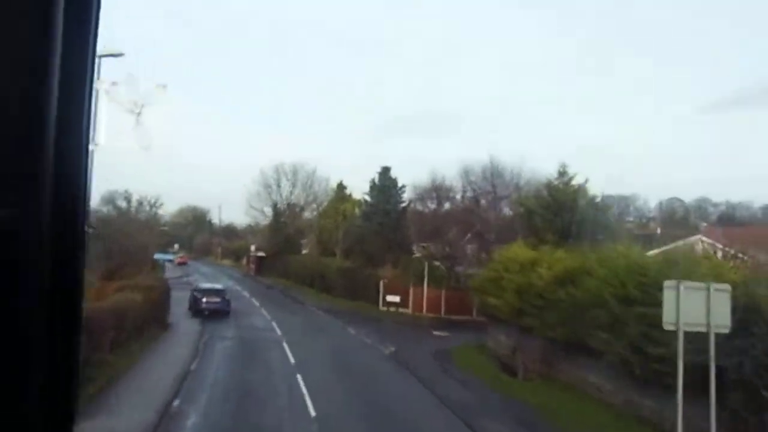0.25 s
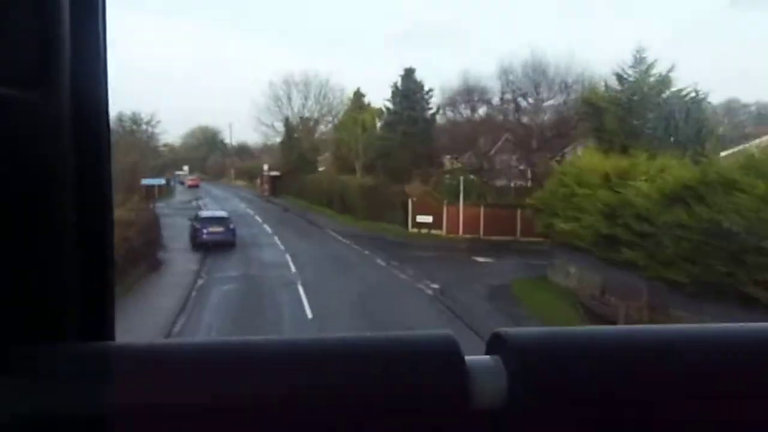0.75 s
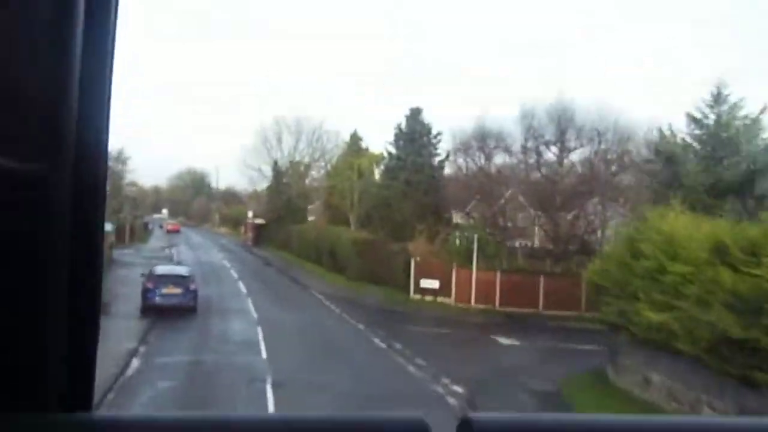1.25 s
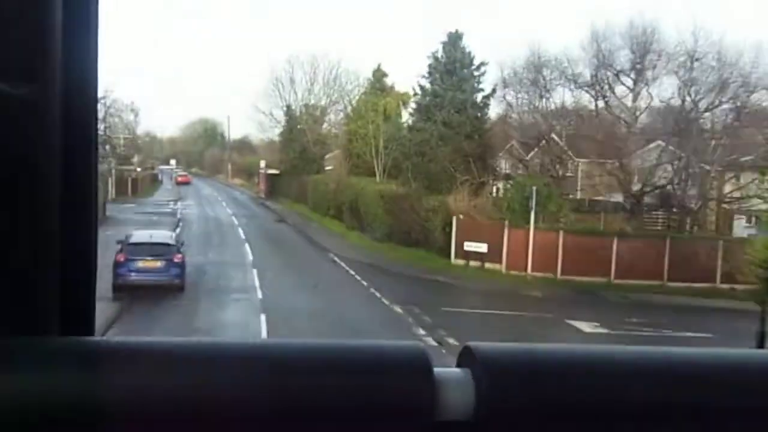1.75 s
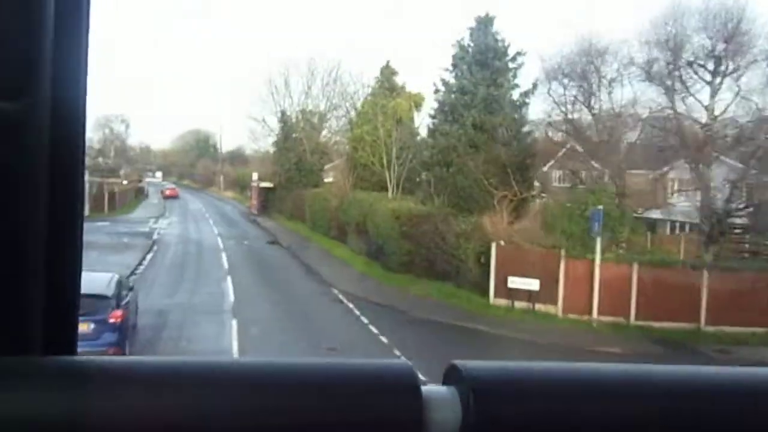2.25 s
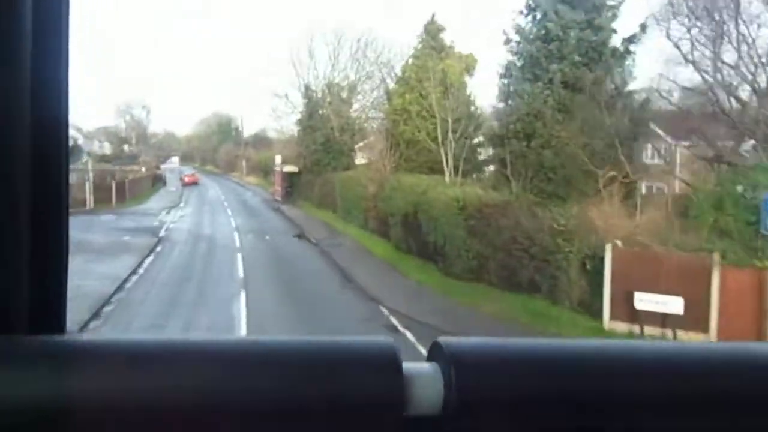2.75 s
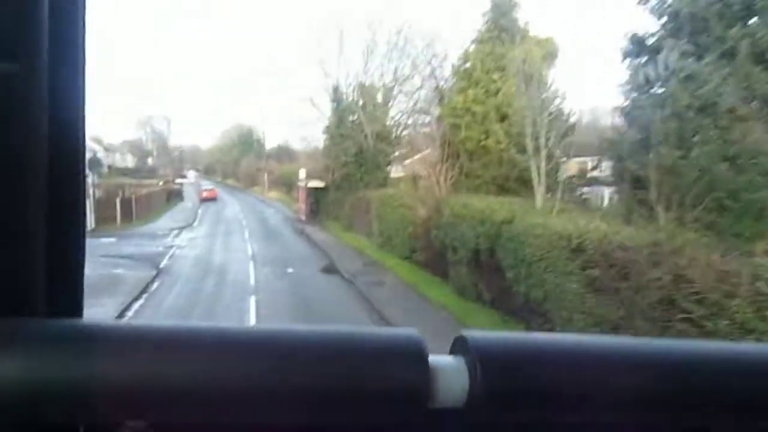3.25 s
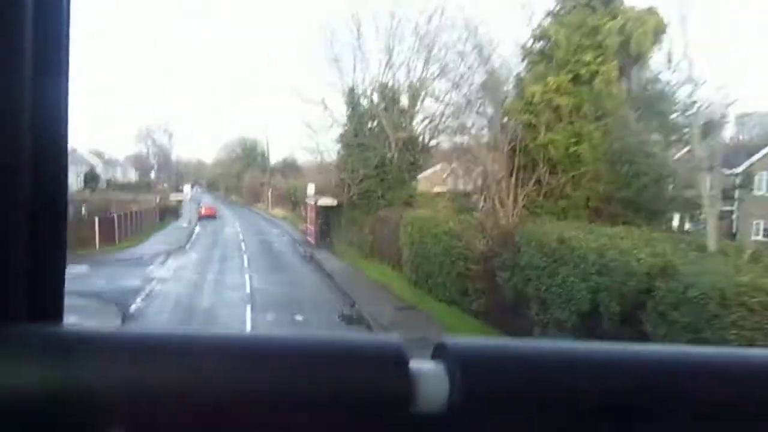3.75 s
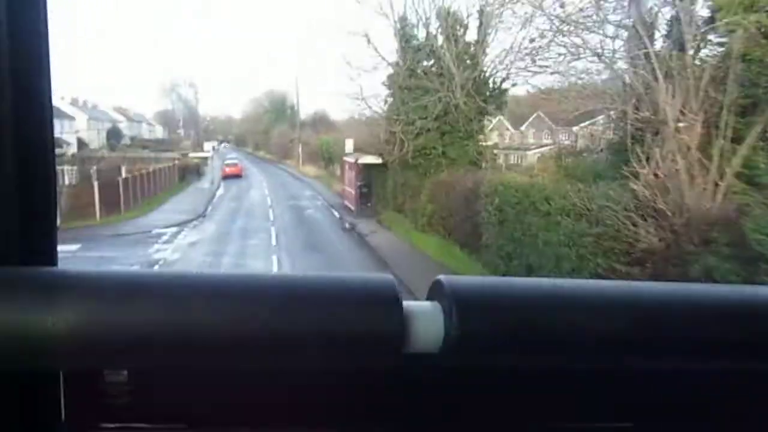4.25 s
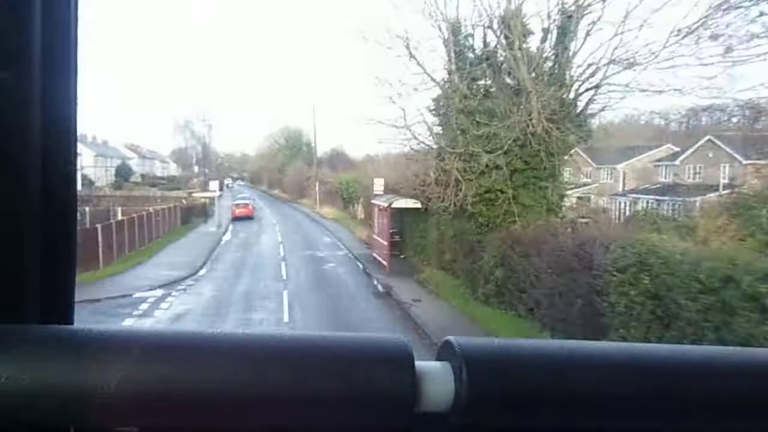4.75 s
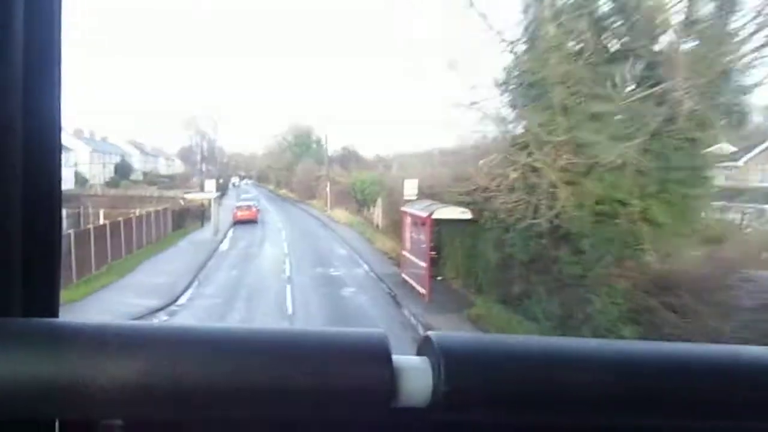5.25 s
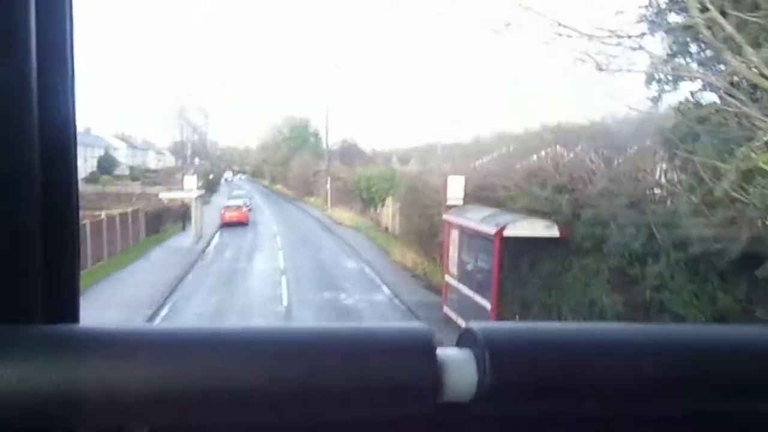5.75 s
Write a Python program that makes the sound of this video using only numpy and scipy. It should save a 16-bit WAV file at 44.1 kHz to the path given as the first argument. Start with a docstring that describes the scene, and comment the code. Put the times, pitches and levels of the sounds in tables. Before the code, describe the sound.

Inside the upper deck of a moving bus, deep booming air and lumpy rumble dominate, with quieter tyre roar and wet hiss behind. Trim ticks and rattles, and thin squeaks chirp early. A faint steady gear whine fades after three seconds. Two clusters of heavy bumps around 3.7 and 4.2-4.7 seconds overload the close, mono microphone, chopping the hiss, before calmer rumble returns.

```python
"""The cabin of a bus booms and rumbles around a listener at the front window of the upper deck.
Bumps swell resonant noise; short low tone bursts make the rumble lumpy. Shaped noise is road roar, hiss and spray.
Trim rattles as ringing noise bursts, panels knock, squeaks glide and the gears whine as tone pairs.
The biggest pressure swings overload the microphone input, which goes flat and blanks the hiss for milliseconds."""
import sys
import numpy as np
from scipy import signal
from scipy.fft import rfft, irfft, next_fast_len
from scipy.io import wavfile
from scipy.ndimage import uniform_filter1d, minimum_filter1d

SR = 44100
rng = np.random.default_rng(int(sys.argv[2]) if len(sys.argv) > 2 else 0)


def master(y):
    """Save y as 16-bit WAV."""
    cut = np.clip(np.atleast_2d(y).T, -1, 1)
    pcm = np.round(cut * 32767)  # scale
    wavfile.write(sys.argv[1], SR, pcm.astype(np.int16))


N = 264159
T = np.arange(N) / SR

# Reference level for the cabin's low sound: (time [s], level [dB])
BODY_LEVEL = [(0.04, -28), (0.37, -31.5), (0.6, -28.5), (0.75, -31.5), (0.95, -34), (1.15, -34.5),
              (1.23, -34.5), (1.34, -30), (1.73, -33.5), (1.85, -29.5), (2.05, -34), (2.5, -32),
              (2.79, -32), (2.97, -27.5), (3.22, -23), (3.5, -33.5), (3.7, -17.5), (4.1, -31), (4.22, -11),
              (4.45, -29), (4.7, -35), (4.83, -38), (5.05, -35), (5.17, -39), (5.32, -32), (5.52, -29),
              (5.95, -31)]
# Bumps in the road: (time [s], boom added [dB], throb added [dB])
BUMPS = [(0.038, -9, -44), (0.12, -35, -28), (0.26, -26, -22.5), (0.45, -28, -28), (0.631, -13.5, -22),
         (0.76, -21, -19), (1.1, -21.5, -21.5), (0.921, -32.5, -32), (1.342, -16.5, -34), (1.58, -22, -34),
         (1.831, -20.5, -19.5), (1.949, -10, -30), (2.1, -17.5, -46), (2.33, -23.5, -29.5), (2.7, -36, -17),
         (2.79, -14, -26), (2.951, -21, -31.5), (3.07, -29, -15.5), (3.261, -8, -22), (3.581, -13.5, -17.5),
         (3.77, -28.5, -20.5), (4.05, -17, -35), (4.22, -14, -29), (4.33, -15, -25), (4.46, -15, -14),
         (4.58, -26, -32), (4.71, -19, -34), (5.03, -32, -36), (5.293, -24.5, -29), (5.498, -18.5, -42),
         (5.65, -33, -35), (5.901, -20, -31)]
# Cabin air on the springs: (frequency [Hz], relative level [dB])
BOOM_SPECTRUM = [(3, -60), (10, -7), (16, 0.5), (22, -7.5), (28, -7.5), (40, -28), (100, -130)]
# Floor resonance: (frequency [Hz], relative level [dB])
THROB_SPECTRUM = [(15, -67.5), (29, -25), (36, -4.5), (42, -6.5), (50, -24.5), (70, -52), (150, -130)]
# Takes the overtones off boom and throb: (frequency [Hz], relative level [dB])
OVERTONE_CUT = [(3, 0), (55, 0), (90, -30), (200, -90)]
# Engine and axle rumble: (frequency [Hz], relative level [dB])
RUMBLE_SPECTRUM = [(26, -26.5), (45, -8.5), (59, -9), (98, -5), (140, -19), (172, -16.5), (200, -36),
                   (260, -45), (440, -120)]
# Lumps in the rumble: short low tone bursts that swell and fade, some deeper, some higher:
# (centre time [s], width at half height [s], pitch [Hz], peak level [dB])
RUMBLE_LUMPS = [(0.128, 0.023, 83, -12.5), (0.151, 0.02, 159, -40), (0.174, 0.016, 89.0, -21.1),
                (0.22, 0.015, 88.0, -24.5), (0.254, 0.011, 163.0, -32), (0.332, 0.021, 81, -18.5),
                (0.333, 0.024, 170, -31), (0.375, 0.02, 165, -31), (0.62, 0.013, 83.6, -26),
                (0.721, 0.03, 170, -31), (0.726, 0.049, 81.0, -27), (0.779, 0.017, 77.0, -21),
                (0.84, 0.021, 94.5, -22), (1.096, 0.012, 80, -18), (1.155, 0.016, 71.0, -19),
                (1.153, 0.028, 173, -34.5), (1.228, 0.032, 170.0, -33), (1.343, 0.032, 63, -20),
                (1.417, 0.038, 76, -27), (1.63, 0.031, 75.0, -24.5), (1.701, 0.023, 87.0, -25),
                (1.82, 0.018, 67.4, -20.2), (1.883, 0.011, 67.0, -21), (1.949, 0.016, 172, -29),
                (1.97, 0.024, 70.6, -27), (2.32, 0.011, 70.0, -23.5), (2.598, 0.018, 75, -22),
                (2.635, 0.021, 165.0, -32), (2.672, 0.011, 75.5, -15), (2.706, 0.013, 171, -25.5),
                (2.735, 0.013, 67.0, -18), (2.804, 0.016, 161, -25.5), (2.834, 0.028, 71, -20),
                (2.867, 0.027, 160, -27), (2.893, 0.01, 82.5, -15), (2.912, 0.045, 164, -33.9),
                (2.972, 0.022, 88.5, -22), (3.007, 0.012, 76.0, -20.4), (3.084, 0.017, 80.0, -16),
                (3.109, 0.018, 162, -33.5), (3.164, 0.018, 82.4, -19), (3.202, 0.02, 85, -17),
                (3.288, 0.016, 81.0, -30), (3.366, 0.017, 75.4, -22.5), (3.382, 0.023, 169, -29),
                (3.568, 0.024, 68.5, -24), (3.615, 0.043, 93, -12), (3.66, 0.022, 159.0, -17.5),
                (3.937, 0.024, 80.4, -30), (3.948, 0.025, 158, -34), (3.982, 0.01, 93, -22),
                (4.004, 0.032, 169, -35.5), (4.065, 0.012, 77, -24), (4.134, 0.047, 161, -28.5),
                (4.165, 0.019, 69.0, -19.1), (4.415, 0.03, 157, -26.5), (4.423, 0.016, 73, -30),
                (4.718, 0.012, 92.0, -19.5), (5.468, 0.042, 158.0, -38), (5.516, 0.039, 88, -21.5),
                (5.587, 0.0083, 84.0, -18), (5.687, 0.024, 85, -21), (5.756, 0.017, 160.0, -35),
                (5.765, 0.024, 84.0, -22), (5.868, 0.023, 90, -33)]
# Pressure swings that overload the input: (centre time [s], time held flat [ms], direction [+1 or -1])
SWINGS = [(0.731, 1.3, -1), (2.780, 8, -1), (3.271, 3, 1), (3.317, 10, -1), (3.61, 4.0, 1),
          (3.6765, 18, -1), (3.699, 15.5, 1), (3.728, 11.5, -1), (3.746, 6.5, 1), (3.787, 5.5, -1),
          (3.842, 6.5, 1), (3.893, 4.5, -1), (3.919, 1.9, 1), (4.2135, 15.5, -1), (4.244, 21.7, 1),
          (4.272, 17.4, -1), (4.294, 7, 1), (4.3035, 6, 1), (4.32, 5, 1), (4.3555, 10.5, -1), (4.375, 7, 1),
          (4.456, 7, 1), (4.518, 12.5, -1), (4.547, 14.5, 1), (4.576, 12, -1), (4.623, 8, 1),
          (4.654, 13, -1), (4.683, 6, 1)]
# Road noise level as heard, with the recorder's gain steps:
# (time [s], overall level [dB], roar re overall [dB], spray re hiss [dB])
ROAD_LEVELS = [(0.04, -49.5, 4, -3), (0.15, -51.5, 8, -9), (0.2, -46, 6, -8), (0.34, -55, 10.5, -3),
               (0.4, -55, 10.5, -5.5), (0.55, -56, 6.5, -5.5), (0.62, -53, 9.5, -6.5),
               (1.0, -53, 5.5, -8.5), (1.42, -51, 9, -6.5), (1.55, -55.5, 9, -6), (1.78, -55, 7, -6.5),
               (1.96, -53.5, 7.5, -7), (2.34, -57, 6.5, -10), (2.58, -55, 10, -9.5), (2.61, -54, 7, -4.5),
               (2.76, -48, 7.5, -8), (2.86, -46.5, 6, -6), (2.93, -49, 7, -7.5), (3.07, -52, 9, -3.5),
               (3.26, -50.5, 9.5, -5), (3.45, -54.5, 9.5, -3.5), (3.51, -56.5, 2.5, -4.5),
               (3.53, -51.5, 7.5, -5.5), (3.8, -47.5, 9, -2), (4.06, -49.5, 6.5, -7), (4.2, -46.5, 7, -7.5),
               (4.33, -46, 8, -7.5), (4.43, -46.5, 8, -7.5), (4.52, -52.5, 7, -4.5), (4.676, -49, 1, -7),
               (4.682, -62, 3, -4), (4.701, -62, 3, -4), (4.706, -48.5, 7, -9), (4.765, -51, 3, -6.5),
               (4.785, -59, 8, -7.5), (4.85, -62, 8, -9.5), (5.29, -62.5, 7, -8.5), (5.3, -55, 7.5, -10),
               (5.6, -51.5, 9, -6), (5.82, -56, 7.5, -8.5), (5.95, -53.5, 8.5, -7)]
# Tyre roar through the panels: (frequency [Hz], relative level [dB])
ROAR_SPECTRUM = [(120, -7.5), (200, -0.5), (275, -4), (310, -5), (355, -8), (392, -9), (538, -12),
                 (681, -12), (1000, -17.5), (1300, -48), (2200, -120)]
# Tyre and wind hiss: (frequency [Hz], relative level [dB])
HISS_SPECTRUM = [(590, -13.5), (1000, -14), (1070, -4.5), (3000, -14), (3900, -21.5), (6600, -120)]
# Spray, the brightest road noise: (frequency [Hz], relative level [dB])
SPRAY_SPECTRUM = [(1760, -8), (3000, -8), (4420, -3), (6840, -8.5), (7480, -12), (8320, -23.5),
                  (10800, -38), (18300, -120)]
# Water thrown against the panels:
# (time [s], nominal length [s], nominal hiss rise [dB], nominal further spray rise [dB])
SPLASHES = [(0.078, 0.056, -2.5, 5.5), (0.27, 0.038, 2.5, 0), (0.32, 0.025, 2.5, 1.5),
            (0.57, 0.016, -3, 11), (0.806, 0.14, 2, 6.5), (1.445, 0.04, -1.5, 7), (1.596, 0.14, 2.5, 7),
            (2.011, .03, 3.5, 2.5), (2.601, 0.048, 4.5, 5), (2.736, 0.081, -2, 7.5), (3.279, 0.024, 7, 0.5),
            (3.362, 0.065, 8, -2), (3.551, .025, 1.5, -0.5), (3.666, 0.017, 2.5, 7), (3.717, 0.057, 2, -1),
            (4.279, 0.042, 4.5, 3), (4.337, 0.022, 7, 1.5), (4.356, 0.03, 0.5, 7),
            (4.531, 0.014, -4.5, 3.5), (4.576, 0.018, 1.5, 1), (4.655, 0.013, 5, -1)]
# Rattling trim: (time [s], nominal peak level [dB])
RATTLES = [(0.115, -38), (0.191, -40), (0.4245, -40), (0.503, -39.5), (0.5762, -40), (0.6216, -41.5),
           (0.653, -41.5), (0.734, -53), (0.771, -46), (0.914, -37.5), (1.097, -44), (1.1676, -45),
           (1.217, -53), (1.3329, -43), (1.3774, -40), (1.5994, -53), (2.583, -47), (2.608, -39),
           (2.831, -38), (2.9492, -36), (3.275, -41), (3.3682, -34), (3.525, -37.5), (3.686, -37),
           (3.938, -34.5), (3.987, -30), (4.706, -44), (4.9792, -49), (5.2967, -53), (5.332, -53),
           (5.3592, -46), (5.409, -43), (5.508, -32.5), (5.591, -36)]
# Modes of the rattling trim: (frequency [Hz], relative level [dB], time to fall 60 dB [s])
TRIM_MODES = [(3200, -2, .018), (3620, -2, .022), (4900, -7, .02), (5650, -7, .025)]
# Loose panel knocks: (time [s], pitch [Hz], level before rise and fade [dB])
KNOCKS = [(.213, 480, -41), (.64, 800, -45), (1.373, 760, -36), (1.817, 760, -40), (1.824, 790, -38),
          (2.697, 2480, -52), (2.829, 1600, -40), (2.83, 2500, -50), (2.752, 760, -42), (3.278, 1500, -38)]
# Squeaking trim: (time [s], length [s], start pitch [Hz], end pitch [Hz], nominal level [dB],
# second harmonic re first [dB])
SQUEAKS = [(.465, .014, 2500, 2600, -54, -10), (.482, .024, 2750, 2750, -56, -9),
           (.586, .028, 2740, 2750, -55, -10), (.808, .018, 2870, 2780, -51, -2.5),
           (.826, .05, 2820, 2790, -54, -8), (.886, .018, 2730, 2760, -51, -4),
           (.906, .022, 2740, 2810, -50.5, -11), (.928, .02, 2700, 2880, -56, -14),
           (2.691, .017, 1040, 1110, -43, -7), (2.707, .034, 1070, 1040, -47, -3)]
# Gear whine: (time [s], tooth mesh rate [Hz], level [dB])
GEAR_WHINE = [(0, 341, -57), (.12, 340, -58), (.17, 340, -52), (.4, 339, -52), (.72, 345, -51.5),
              (1.05, 342, -53), (1.15, 340, -59), (1.3, 339, -58), (1.38, 340, -51), (2.2, 340, -52),
              (2.52, 344, -53), (2.6, 341, -57), (2.68, 343, -52), (3.25, 348, -54.5), (3.5, 346, -74),
              (6, 346, -72)]

FLAT_TOP = 0.29  # input limit, amplitude
COUPLING_HZ, TOP_HZ = 8.5, 8300  # low and high cuts of the microphone chain
BOOM_FADE_S, THROB_FADE_S = 0.11, 0.073  # time for a bump's gain to fall to 1/e
BOOM_REST_DB, THROB_REST_DB = 1.5, -4  # between bumps, re body level
RUMBLE_REST_DB = -1  # between lumps, re body level
HISS_DB = -5.0  # re overall road level
SPLASH_RISE_S = 0.0017
ROAR_SHARE = 0.52  # part of a splash's rise in dB that the roar takes on
RATTLE_T60_S = 0.057
CREST_DB = 13  # allowance for how far a noise burst peaks over its rms
TRIM_DB = -26.5  # ringing modes re burst
KNOCK_RISE_S, KNOCK_FADE_S = .0008, .007  # exponential time constants
OCTAVE_DB = -9  # whine's second harmonic re first


def body():
    """Cabin air booms, the floor throbs, engine and axles rumble; swings ease off short of the input limit."""
    level_db, = read(BODY_LEVEL)
    boom_gain = bumps(level_db + BOOM_REST_DB, 1, BOOM_FADE_S)
    throb_gain = bumps(level_db + THROB_REST_DB, 2, THROB_FADE_S)
    low = boom_gain * resonance(BOOM_SPECTRUM)
    low += throb_gain * resonance(THROB_SPECTRUM)
    rumble_gain = undb(level_db + RUMBLE_REST_DB + 2.5 * walk(13))
    low += rumble_gain * colour(rng.standard_normal(N), RUMBLE_SPECTRUM)
    low += rumble_lumps()

    reach = .92 * FLAT_TOP
    window = int(.016 * SR)
    ease = minimum_filter1d(reach / np.maximum(np.abs(low), reach), 2 * window)
    return low * uniform_filter1d(uniform_filter1d(ease, window), window)


def bumps(rest_db, column, fade_s):
    """Bump energy swells and fades exponentially and adds to a resting level; returns gain."""
    power = undb(rest_db) ** 2
    for row in BUMPS:
        s = row[0]
        at = near(s - 6 * fade_s, s + 6 * fade_s)
        power[at] += undb(row[column]) ** 2 * np.exp(-2 * np.abs(T[at] - s) / fade_s)
    return np.sqrt(power)


def resonance(spectrum):
    """A driven resonance: narrow noise with evened level, stripped of overtones."""
    ringing = colour(rng.standard_normal(N), spectrum)
    return colour(evened(ringing, .6), OVERTONE_CUT)


def evened(x, share):
    """A well-driven resonance wanders more in pitch than level: reduce its level swings; rms 1."""
    envelope = np.abs(signal.hilbert(x, next_fast_len(N))[:N])
    y = x / (envelope + .2) ** share
    return y / np.std(y)


def rumble_lumps():
    """Lumps in the rumble: short low tone bursts that swell and fade, some deeper, some higher."""
    out = np.zeros(N)
    start_turns = rng.random(len(RUMBLE_LUMPS))
    for (s, width, hz, db), turn in zip(RUMBLE_LUMPS, start_turns):
        at = near(s - 2 * width, s + 2 * width)
        t = T[at] - s
        swell = 2. ** (-(2 * t / width) ** 2)
        out[at] += undb(db) * swell * np.sin(2 * np.pi * (hz * t + turn))
    return out


def swings(low):
    """Each big swing of cabin pressure takes over the low sound and arches past the input's limit."""
    out = low.copy()
    for s, held_ms, direction in SWINGS:
        held = held_ms / 1000
        span = held + 0.01987
        at = near(s - span / 2, s + span / 2)
        arch = np.cos(np.pi * np.clip((T[at] - s) / span, -.5, .5))
        # scaled to cross the limit at both ends of the held time
        peak = direction * FLAT_TOP / np.cos(np.pi * held / span / 2)
        swing = out[at] * (1 - np.clip(2.5 * arch, 0, 1)) + peak * arch
        # a crest already past the limit stays there
        out[at] = np.where(direction * out[at] > FLAT_TOP, out[at], swing)
    return out


def road():
    """Tyre roar, hiss and spray; shaking panels let them through unevenly, and loose bits tick sharply."""
    overall_db, roar_db, spray_db = read(ROAD_LEVELS)
    rise_db, more_db = splashes()
    shake = walk(60)
    # about 45 ticks a second, each fading over 3.7 ms
    ticks = (rng.random(N) < 45 / SR) * undb(1.2 * rng.exponential(size=N))
    chatter = signal.lfilter([1], [1, -np.exp(-1 / (0.0037 * SR))], ticks)

    roar_gain = undb(roar_db + ROAR_SHARE * rise_db + 1.8 * shake) * (1 + 0.06 * chatter)
    roar = roar_gain * colour(rng.standard_normal(N), ROAR_SPECTRUM)
    air = rng.standard_normal(N)  # hiss and spray share one noise
    hiss = (1 + 0.69 * chatter) * colour(air, HISS_SPECTRUM)
    spray = undb(spray_db + more_db) * (1 + 0.74 * chatter) * colour(air, SPRAY_SPECTRUM)
    bright_gain = undb(rise_db + 0.5 * shake + HISS_DB)
    return undb(overall_db) * (roar + bright_gain * (hiss + spray))


def splashes():
    """Thrown water changes hiss and spray quickly, holds for half its length, then lets go; in dB."""
    hiss_db, spray_db = np.zeros(N), np.zeros(N)
    for s, length, rise_db, more_db in SPLASHES:
        corners = [0, SPLASH_RISE_S, SPLASH_RISE_S + length / 2, SPLASH_RISE_S + 1.23 * length]
        # the small end values carry on before and after
        shape = np.interp(T - s, corners, [0.0058, 1.07, 1.04, 0.031])
        hiss_db += rise_db * shape
        spray_db += more_db * shape
    return hiss_db, spray_db


def rattles():
    """Trim knocks: a sharp burst of broad noise that dies fast and rings the trim's modes."""
    burst = np.zeros(N)
    for s, peak_db in RATTLES:
        at = near(s, s + RATTLE_T60_S)
        burst[at] += undb(peak_db - 60 * (T[at] - s) / RATTLE_T60_S)
    noise = rng.standard_normal(N)
    out = burst * (colour(noise, HISS_SPECTRUM) + 0.85 * colour(noise, SPRAY_SPECTRUM))
    for hz, db, t60 in TRIM_MODES:
        decay = np.exp(-np.log(1000) / (t60 * SR))  # per sample
        angle = 2 * np.pi * hz / SR
        poles = [1, -2 * decay * np.cos(angle), decay * decay]
        out += undb(db + TRIM_DB) * signal.lfilter([np.sin(angle)], poles, burst * noise)
    return undb(-CREST_DB) * out


def knocks():
    """A loose panel rings briefly: each knock is a tone that starts fast and fades."""
    out = np.zeros(N)
    for s, hz, db in KNOCKS:
        at = near(s, s + 6 * KNOCK_FADE_S)
        t = (T[at] - s).clip(0)
        shape = (1 - np.exp(-t / KNOCK_RISE_S)) * np.exp(-t / KNOCK_FADE_S)
        out[at] += undb(db) * shape * np.sin(2 * np.pi * hz * t)
    return out


def squeaks():
    """Stick-slip of plastic on metal: a short gliding, unsteady tone with its octave, slower to fade than start."""
    out = np.zeros(N)
    wobble = walk(400)
    grip = undb(3.0 * walk(350))
    for s, length, start_hz, end_hz, db, octave_db in SQUEAKS:
        at = near(s, s + length)
        part = np.clip((T[at] - s) / length, 0, 1)
        hz = (start_hz + (end_hz - start_hz) * part) * (1 + .018 * wobble[at])
        phase = 2 * np.pi * np.cumsum(hz) / SR
        shape = np.sin(np.pi * np.sqrt(part)).clip(0) ** .7
        tone = np.sin(phase) + undb(octave_db) * np.sin(2 * phase)
        out[at] += undb(db) * shape * grip[at] * tone
    return out


def whine():
    """Gear teeth mesh at a near steady rate, heard as a wavering tone and its octave."""
    hz, db = read(GEAR_WHINE)
    phase = 2 * np.pi * np.cumsum(hz * (1 + .0025 * walk(10))) / SR
    first = undb(db + 1.3 * walk(14)) * np.sin(phase)
    second = undb(db + OCTAVE_DB + 2.2 * walk(9)) * np.sin(2 * phase)
    return np.sqrt(2) * (first + second)  # levels are rms


def undb(db):
    """Gain of a dB value."""
    return 10 ** (np.asarray(db) / 20)


def colour(x, spectrum):
    """Shape x by (frequency [Hz], level [dB]) points, joined on a log frequency axis; rms 1."""
    hz, db = np.transpose(spectrum)
    f = np.arange(N // 2 + 1) * SR / N + 1e-3  # keeps log(0) away
    gain = undb(np.interp(np.log(f), np.log(hz), db))
    y = irfft(rfft(x) * gain, N)
    return y / np.std(y)


def walk(rate):
    """Random levels held 1 / rate s and slewed twice; spread near 1."""
    hold = int(SR / rate)
    steps = np.repeat(rng.standard_normal(N // hold + 1), hold)
    return 1.28 * uniform_filter1d(uniform_filter1d(steps, hold), hold)[:N]


def read(table):
    """Columns of a curve table at every sample."""
    s, *columns = np.transpose(table)
    return [np.interp(T, s, c) for c in columns]


def near(start_s, end_s):
    """The samples between two times."""
    return slice(max(int(start_s * SR), 0), int(end_s * SR) + 1)


def scene():
    """Everything heard at the front window, as one channel."""
    cabin = swings(body())
    trim = rattles() + squeaks() + knocks()
    return (cabin + road() + trim + whine())[None]


def record(dry):
    """The input clips hard; the coupling capacitor after it lets each flat top sag; then the top is cut."""
    clipped = np.clip(dry, -FLAT_TOP, FLAT_TOP)
    coupled = signal.lfilter(*signal.butter(1, COUPLING_HZ, "high", fs=SR), clipped)
    top_cut = signal.ellip(8, .2, 70, TOP_HZ, fs=SR, output="sos")
    return signal.sosfilt(top_cut, coupled)


dry = scene()
out = record(dry)
master(out)
```